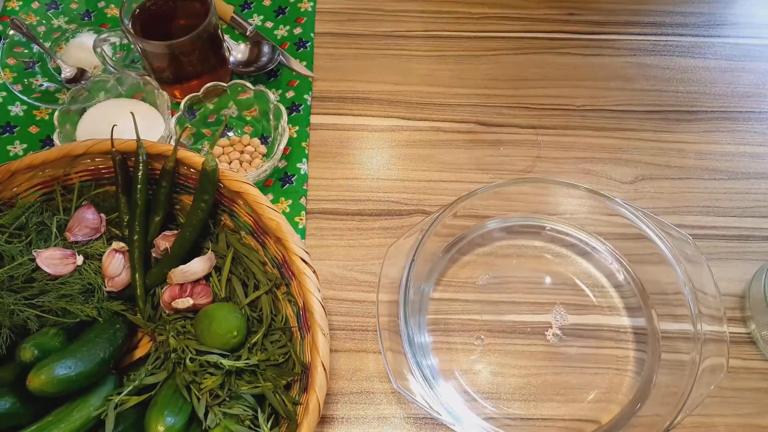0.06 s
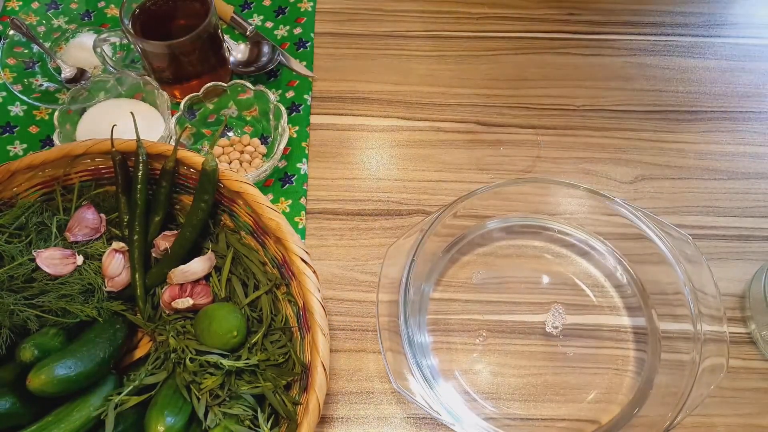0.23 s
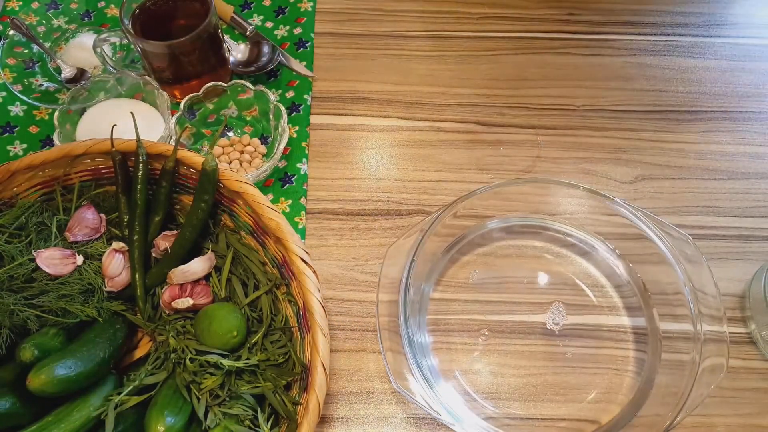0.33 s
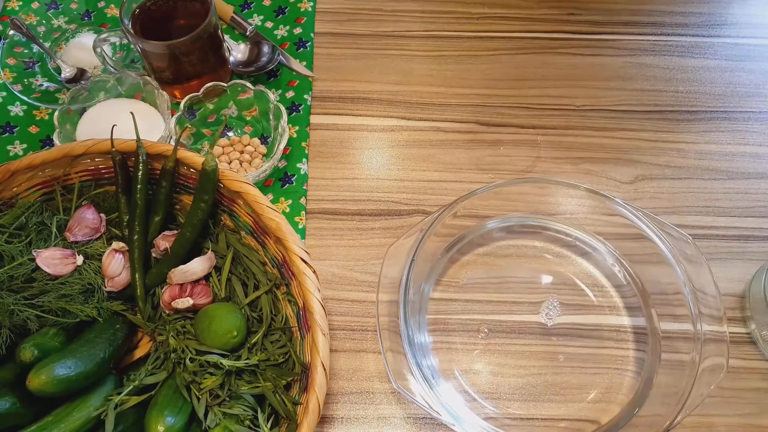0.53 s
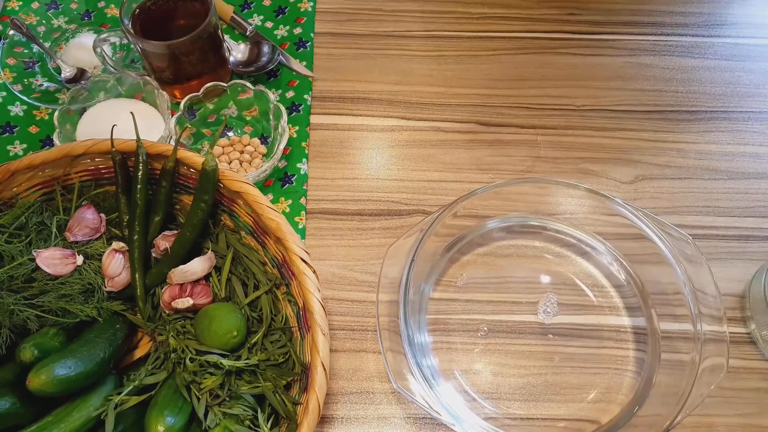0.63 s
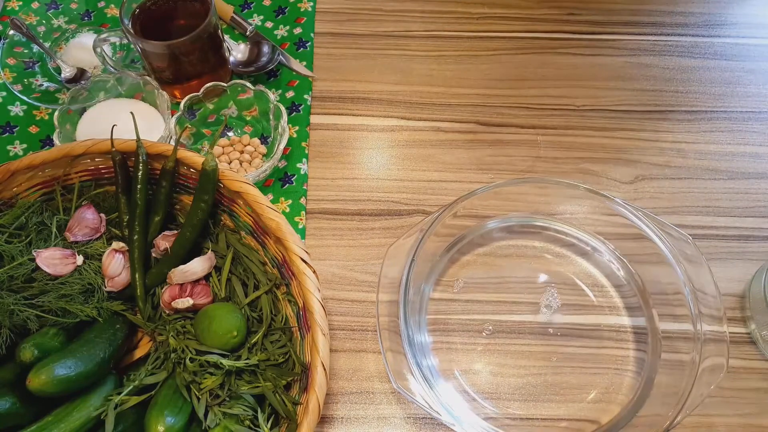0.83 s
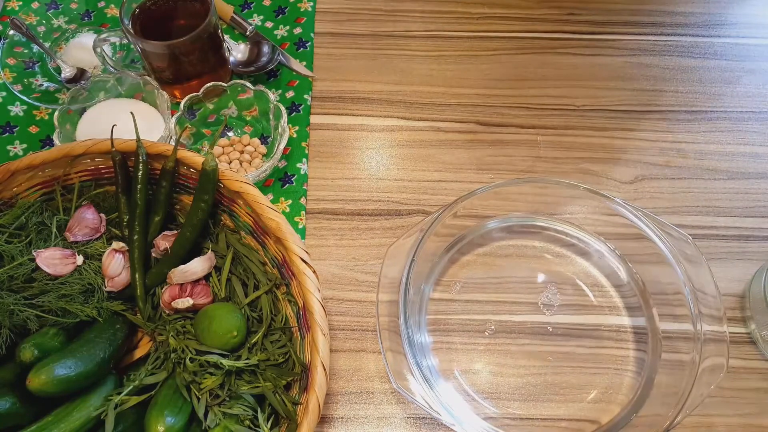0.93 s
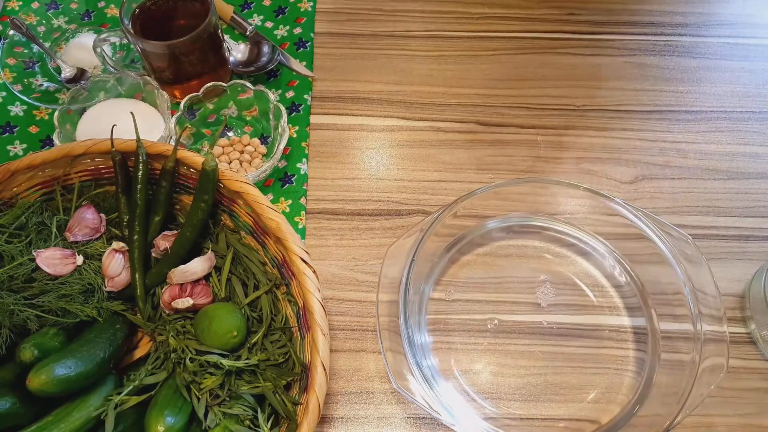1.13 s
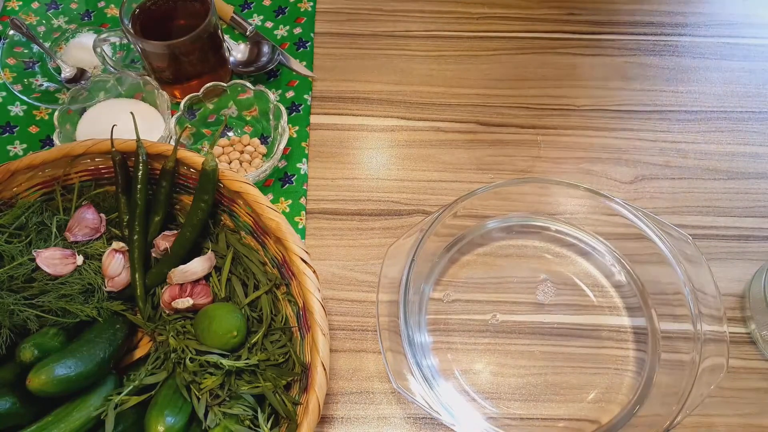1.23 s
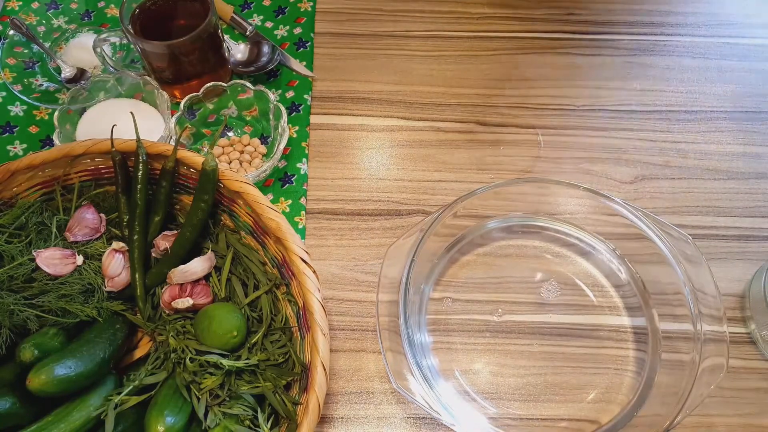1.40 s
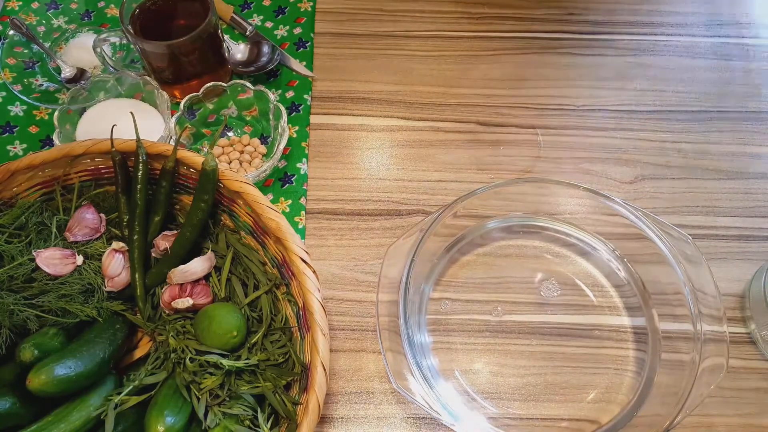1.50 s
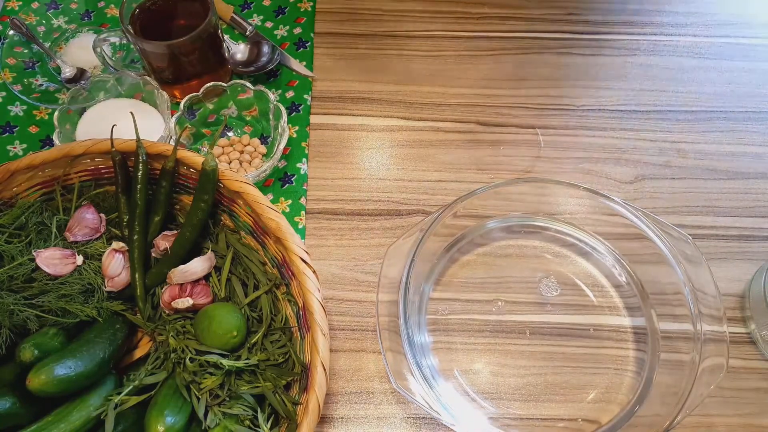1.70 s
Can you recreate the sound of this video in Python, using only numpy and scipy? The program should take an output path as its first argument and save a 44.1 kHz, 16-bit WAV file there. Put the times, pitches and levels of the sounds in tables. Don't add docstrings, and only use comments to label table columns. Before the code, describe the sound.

Glass jug thuds and grinds onto a wooden table top, then settles with a softer knock

```python
import sys
import numpy as np
from scipy import signal
from scipy.io import wavfile
from scipy.ndimage import uniform_filter1d

SR = 44100
rng = np.random.default_rng(int(sys.argv[2]) if len(sys.argv) > 2 else 0)


def decibels_to_gain(level_db):
    exponent = np.asarray(level_db, float) / 20
    return 10 ** exponent


def materialize(psi):
    bounded = np.clip(np.atleast_2d(psi).T, -1, 1)
    quanta = np.round(bounded * 32767).astype(np.int16)
    wavfile.write(sys.argv[1], SR, quanta)


N = 77175

# (frequency [Hz], level [dB per Hz])
RUMBLE = [(15, -39), (25, 3.5), (55, -6.5), (84, -0.5), (156, -10), (338, -10), (388, -10.5), (585, -15),
          (769, -25.5), (1500, -37), (1950, -99)]
# (time [s], level [dB])
AIRFLOW = [
    (0, 0.5),
    (.2, -1.5),
    (.45, -1.5),
    (.8, 1.5),
    (1.05, -1),
    (1.2, 1.5),
    (1.3, -1.5),
    (1.6, 1.5),
    (1.68, 1),
    (1.75, -3.5),
]
# (frequency [Hz], width [Hz], level [dB rms])
DRONES = [(158.5, 13.5, -61.5), (223, 74, -57.5), (265.7, 19.5, -59)]
# (frequency [Hz], level [dB per Hz])
HISS = [(590, -46), (1000, -13), (2710, -11), (3490, -8), (4390, -13.5), (5150, -18), (7610, -23),
        (9470, -13.5), (15500, -1.5)]
# (frequency [Hz], likeness [0-1])
SAME = [(60, 0.65), (180, 1), (550, 0.15), (1650, 0.02), (4970, 0), (15000, 0.08)]
HUM_ORDERS = [1, 6, 8, 9, 10, 11, 12, 13, 14, 17]
HUM_DB = [-53, -65.5, -87, -67.5, -69, -70.5, -72, -78, -81, -86.5]
WHINE_ORDERS = [63, 64, 65, 66, 67, 69, 70, 71, 72, 73, 74, 75, 76, 79, 85]
WHINE_DB = [-88, -89, -86, -89, -90, -80, -81.5, -74, -73, -76, -90, -85.5, -87.5, -89, -87]
# (time [s], level [dB])
WHINE_SWELL = [(0, -73), (.25, -71), (.354, -75), (.57, -69), (.7, -72), (.95, -74.5), (1.25, -66.5),
               (1.34, -69.5), (1.42, -80), (1.6, -80), (1.72, -75)]
SMEAR_RAD = (.283, -.8, -3.7, 0)
# (time [s], low tone [Hz], its level [dB rms], high tone [Hz], its level [dB rms])
FAN = [
    (0, 64.3, -64, 335.5, -60),
    (.36, 64.3, -57, 335.2, -55),
    (.4, 65.9, -57, 334.5, -55),
    (.65, 65.9, -57, 334.8, -52.5),
    (.88, 65.9, -61, 335.8, -59),
    (1, 65.5, -58, 336, -60),
    (1.05, 64.2, -57, 335.9, -60),
    (1.5, 64.1, -54, 335.8, -59.5),
    (1.62, 64.2, -59, 335.8, -56),
    (1.75, 64.2, -64, 335.8, -59),
]
# (time [s], strength [dB], contact [ms])
LANDING = [(.2158, -23.5, 0.92), (.2235, -23.5, 0.7), (.2320, -17, 1.14), (.2385, -21, 0.71),
           (.2470, -27.5, 0.72), (.2560, -28.5, 1.46), (.2640, -16.5, 1.56), (.2760, -38, 3.4),
           (.2900, -42, 0.78), (.3060, -47, 1.6), (.3380, -29, 2.1), (.3680, -49, 0.53)]
# (time [s], strength [dB], contact [ms])
SETTLING = [
    (.6345, -43.5, 0.64),
    (.6480, -39, 0.4),
    (.6600, -59, 3.3),
    (.6695, -35.5, 0.8),
    (.6820, -34.5, 2.56),
    (.6945, -44, 1.83),
]
# (frequency [Hz], t60 [s], landing level [dB], settling level [dB])
TABLE = [(120, 0.022, -13, 4.5), (217.5, 0.05, -7, 3), (314, 0.1, -8, 1.5), (390.2, 0.038, 2, 7),
         (435.6, 0.07, -9.5, -4.5), (485.4, 0.054, -4.5, -19), (576.6, 0.078, -4.5, -2.5),
         (717.4, 0.097, -4, -2), (791, 0.032, 5, -5.5), (881, 0.071, -5, -18), (970, 0.043, -13, -28),
         (1310, 0.063, -28.5, -15), (1646, 0.11, -13.5, -41), (1690, 0.14, -19.5, -36)]
# (frequency [Hz], left-right level [dB], left lead [rad])
EARS = [(79.3, 1.5, 0.1), (261, 0, 0.54), (420, 2.5, 0.5), (543, -4.5, 0), (580, 5.5, -1.5),
        (782, 1.5, 2.23), (890, 7.5, 1.5), (1700, 0.5, 4)]
# (frequency [Hz], level [dB per Hz])
GRIT = [(900, 11), (1700, -3.5), (2500, -14), (3800, -18.5), (5800, -26.5), (7300, -31), (9000, -23.5),
        (15500, -25.5)]
# (time [s], level [dB])
PRESS = [
    (.212, -50),
    (0.218, -25),
    (.227, -16.5),
    (.245, -19),
    (.276, -20),
    (.284, -25.5),
    (.315, -30),
    (.345, -35.5),
    (.45, -55),
]
# (time [s], frequency [Hz], peak level [dB], rise [s], t60 [s])
SWAYS = [(.2150, 12300, -60, .006, .08), (.2150, 8830, -59, 0.0087, .1), (.2135, 527, -20.5, 0.016, .07),
         (0.218, 162, -24.5, 0.021, 0.16), (.2140, 415, -28, .012, .08), (.2135, 735, -25, .012, .11),
         (.2300, 760, -28, .014, .05), (.2320, 620, -29, .014, .1), (.2450, 1560, -46, .02, .12),
         (.2200, 4180, -64, .02, .5), (.2300, 12250, -61, .004, .05), (.2400, 560, -29, .012, .07),
         (.2450, 403, -30, .018, .06), (.2320, 88, -28, 0.023, 0.081), (0.295, 79, -33, 0.02, 0.14),
         (.2980, 511, -35, 0.015, 0.12), (.3250, 470, -36, .014, .04), (.6290, 524, -39, 0.0083, 0.13),
         (0.633, 162, -31.5, 0.025, 0.09), (.6310, 753, -40.5, 0.028, 0.07), (.6300, 372, -37, 0.01, 0.2),
         (.6620, 405, -39, 0.015, 0.07), (0.671, 152, -37, 0.016, 0.05), (.6550, 305, -39, .012, .05),
         (.6820, 345, -36.5, .013, .04), (.6900, 275, -37, 0.009, 0.05), (.6950, 210, -44, .02, .1),
         (.7200, 400, -47, .025, .1)]
# (time [s], level [dB])
PANEL = [
    (.217, -34),
    (.232, -25),
    (.265, -22),
    (.300, -34),
    (.318, -37),
    (.335, -34.5),
    (.368, -39.5),
    (.388, -54),
    (.418, -46),
    (.44, -62),
]
# (frequency [Hz], t60 [s])
KITCHEN = [(80, 0.66), (320, 0.57), (700, 0.42), (1600, 0.19), (3000, 0.17), (8000, 0.37)]
# (frequency [Hz], level [dB per Hz])
LATE_HISS = [(2000, -1.5), (3200, -7), (5500, -7.5), (8000, -7), (11000, 1)]

RUMBLE_DB, HISS_DB, LATE_HISS_DB = -54, -61, -68.5
HITS_WET_DB, SWAYS_WET_DB, PANEL_WET_DB = -7.5, -10.5, -20
SHAFT_HZ, HUM_START_RAD = 49.13, -.93
CORE_ORDER, CORE_SPAN = 72, 3.5
WAVER_DB, WAVER_HZ, DRIFT_RAD, SCATTER_RAD = 1.2, 4.0, .12, .05
FAN_START_RAD = 2.5
MAINS_HZ, BUZZ_DB, BUZZ_SPREAD_DB = 99.94, -90, 3.5
SPOT_DB, SPOT_RAD_PER_KHZ = 2.5, 1.5
GRIT_DB, GRIT_T60, GRIT_RISE_S = -20, 0.18, 0.0015
PANEL_HZ = 264.9
LATE_HISS_START_S, LATE_HISS_RISE_S = 1.31, 0.34
LOW_CUT_HZ, TOP_HZ = 38, 15480


def read(points, hz):
    f, value = np.transpose(points)
    return np.interp(np.log(hz + 1), np.log(f + 1), value)


def evened(x):
    return x / np.sqrt(np.mean(x ** 2) + 1e-30)


def slow(rate_hz, count):
    t = np.arange(N)[::64] / SR
    f = rate_hz * np.geomspace(.1, 1, num=8)[:, None]
    rows = []
    for start in rng.random((count, 8)):
        wander = np.sin(2 * np.pi * (f * t + start[:, None])).sum(0)
        rows.append(evened(wander).repeat(64)[:N])
    return np.array(rows)


def noise(spectrum, patchy_db, low_hz, high_hz):
    frames, hz = N // 512 + 5, np.fft.rfftfreq(2048, 1 / SR)
    a, b, c, d, patches = rng.standard_normal((frames, 1025, 5)).T
    patches = uniform_filter1d(patches, size=8, axis=0)
    patches = evened(uniform_filter1d(patches, size=6, axis=1))
    same = np.clip(read(SAME, hz), -1, 1)[:, None]
    left = a + 1j * b
    right = same * left + np.sqrt(1 - same ** 2) * (c + 1j * d)
    edge = np.minimum(hz / low_hz, 1) ** 4 / (1 + (hz / high_hz) ** 4)
    colour = decibels_to_gain(read(spectrum, hz)[:, None] + patchy_db * patches) * edge[:, None]
    return evened(signal.istft(np.array([left, right]) * colour, nperseg=2048, noverlap=1536)[1][:, :N])


def rumble():
    sides = decibels_to_gain(RUMBLE_DB + np.array([[.5], [-.5]]))
    return sides * noise(RUMBLE, patchy_db=1.5, low_hz=25.3, high_hz=1360)


def hiss():
    sides = decibels_to_gain(HISS_DB + np.array([[1.1], [-1.1]]))
    return sides * noise(HISS, patchy_db=1.0, low_hz=1000, high_hz=21000)


def drones():
    t, out = np.arange(N) / SR, np.zeros((2, N))
    for hz, width_hz, db in DRONES:
        r = np.exp(-np.pi * width_hz / SR)
        z = rng.standard_normal((2, N + SR // 4, 2)) @ [1, 1j]
        z = signal.lfilter([1], [1, -2 * r, r * r], z)[:, -N:]
        pair = np.array([z[0] + 0.14 * z[1], z[0] - 0.45 * z[1]])
        out += decibels_to_gain(db) * evened((pair * np.exp(2j * np.pi * hz * t)).real)
    return out


def orders(multiples, levels_db, apart_rad):
    k, t, count = np.array(multiples)[:, None], np.arange(N) / SR, len(multiples)
    smear = np.polyval(SMEAR_RAD, k - CORE_ORDER) + SCATTER_RAD * rng.standard_normal((count, 1))
    start = np.where(k > 1, smear + DRIFT_RAD * slow(WAVER_HZ, count), HUM_START_RAD)
    phase = 2 * np.pi * SHAFT_HZ * k * t + start
    size = np.sqrt(2) * decibels_to_gain(levels_db + WAVER_DB * slow(WAVER_HZ, count) * (k > 1))
    lean = apart_rad * (k > 1)
    return np.array([(size * np.sin(phase + side * lean) / np.cos(lean)).sum(0) for side in (-1, 1)])


def fridge():
    s, db = np.transpose(WHINE_SWELL)
    core = np.exp(-((np.array(WHINE_ORDERS)[:, None] - CORE_ORDER) / CORE_SPAN) ** 2)
    swell_db = core * np.interp(np.arange(N) / SR, s, db + 71.0)
    whine = orders(WHINE_ORDERS, np.array(WHINE_DB)[:, None] + swell_db, apart_rad=0.75)
    hum = orders(HUM_ORDERS, np.array(HUM_DB)[:, None], apart_rad=0.54)
    return hum + whine


def fan():
    t, (s, *columns) = np.arange(N) / SR, np.transpose(FAN)
    low_hz, low_db, high_hz, high_db = [np.interp(t, s, c) for c in columns]
    hz, db = np.array([low_hz, high_hz]), np.array([low_db, high_db])
    size = np.sqrt(2) * decibels_to_gain(db + .6 * slow(5.0, count=2))
    phase = 2 * np.pi * hz.cumsum(1) / SR + FAN_START_RAD + .1 * slow(3.0, count=2)
    return (size * np.sin(phase)).sum(0) * decibels_to_gain(np.array([[.7], [-.7]]))


def lamp():
    t, k = np.arange(N) / SR, np.arange(110, 155)[:, None]
    spread, start = rng.standard_normal((len(k), 2, 2)).T[:, :, :, None]
    tilt_db = 3.5 * (k / k[-1] - 1) * 3
    size = decibels_to_gain(BUZZ_DB + tilt_db + BUZZ_SPREAD_DB * spread)
    return (size * np.sin(2 * np.pi * MAINS_HZ * k * t + 2 * start)).sum(1)


def ears(hz):
    f, db, lead = np.transpose(EARS)
    side = np.array([.5, -.5]).reshape(2, *[1] * np.ndim(hz))
    return decibels_to_gain(side * read(np.c_[f, db], hz)), side * read(np.c_[f, lead], hz)


def knock(blows, column):
    t, out, grit = np.arange(SR // 2) / SR, np.zeros((2, N + SR)), np.zeros(N + SR)
    modes = np.array(TABLE)
    hz, t60, mode_db = (modes[:, [k]] for k in (0, 1, column))
    gain, lead = ears(hz)
    spots = rng.standard_normal((len(blows), 2, len(TABLE), 1))
    for (s, db, contact_ms), (spot, skew) in zip(blows, spots):
        at = round(s * SR)
        span = slice(at, at + len(t))
        push = np.sin(np.pi * np.clip(t[:256] / (contact_ms / 1000), 0, 1))
        size = decibels_to_gain(db + mode_db + SPOT_DB * spot - 60 * t / t60)
        for ear in (0, 1):
            turn = lead[ear] + (.5 - ear) * SPOT_RAD_PER_KHZ * np.minimum(hz / 1000, 1) * skew
            ring = (gain[ear] * size * np.sin(2 * np.pi * hz * t + turn)).sum(0)
            ring *= np.minimum(t / 0.0016, 1)
            out[ear, span] += signal.oaconvolve(ring, push / push.sum())[:len(t)]
        rise = np.minimum(t / GRIT_RISE_S, 1) ** 2
        grit[span] += rise * decibels_to_gain(2 * (db - 60 * t / GRIT_T60)) / contact_ms ** 2
    return out[:, :N], np.sqrt(grit[:N])


def jug():
    grind = decibels_to_gain(np.interp(np.arange(N) / SR, *np.transpose(PRESS), left=-120, right=-120))
    landing, _ = knock(LANDING, column=2)
    settling, settling_grit = knock(SETTLING, column=3)
    grains = decibels_to_gain(evened(uniform_filter1d(rng.standard_normal(N), size=90)))
    buzz = grains * noise(GRIT, patchy_db=0.5, low_hz=777, high_hz=20000)
    return landing + settling + decibels_to_gain(GRIT_DB) * (grind + settling_grit) * buzz


def sways():
    t, out = np.arange(N) / SR, np.zeros((2, N))
    for s, hz, db, rise_s, t60 in SWAYS:
        u = np.maximum(t - s, 0)
        rise = np.sin(np.pi / 2 * np.minimum(u / rise_s, 1)) ** 1.16
        shape = rise * decibels_to_gain(db - 60 * np.maximum(u - rise_s, 0) / t60)
        gain, lead = ears(np.array([hz]))
        out += gain * shape * np.sin(2 * np.pi * hz * u + lead)
    return out


def panel():
    t, (s, db) = np.arange(N) / SR, np.transpose(PANEL)
    gate = np.clip(np.minimum(t - s[0], s[-1] - t) * 200, 0, 1)
    tone = np.sin(2 * np.pi * PANEL_HZ * t + np.array([[-.05], [0]]))
    return np.sqrt(2) * gate * decibels_to_gain(np.interp(t, s, db)) * tone


def kitchen(x):
    taps, slots = np.zeros((2, SR)), np.arange(120, SR - 20, 20)
    at = slots + rng.integers(0, 20, (2, len(slots)))
    np.put_along_axis(taps, at, rng.choice([-1., 1.], at.shape), 1)
    hz, t, z = signal.stft(taps, SR, nperseg=512)
    same = np.clip(read(SAME, hz), -1, 1)[:, None]
    z = np.array([z[0], same * z[0] + np.sqrt(1 - same ** 2) * z[1]])
    decay = decibels_to_gain(-60 * t / read(KITCHEN, hz)[:, None])
    tail = signal.istft(z * decay, SR, nperseg=512)[1]
    return signal.fftconvolve(x, tail / np.linalg.norm(tail[0]), axes=1)[:, :N]


def late_hiss():
    rise = np.clip((np.arange(N) / SR - LATE_HISS_START_S) / LATE_HISS_RISE_S, 0, 1)
    return decibels_to_gain(LATE_HISS_DB) * rise * noise(LATE_HISS, patchy_db=2.0, low_hz=2000, high_hz=12100)


def scene():
    hits, swells, ring = jug(), sways(), panel()
    low_air, thin_hiss = rumble(), hiss()
    airflow = decibels_to_gain(np.interp(np.arange(N) / SR, *np.transpose(AIRFLOW)))
    air = airflow * (low_air + drones())
    wet = kitchen(decibels_to_gain(HITS_WET_DB) * hits + decibels_to_gain(SWAYS_WET_DB) * swells + decibels_to_gain(PANEL_WET_DB) * ring)
    return hits + swells + ring + wet + air + thin_hiss + fridge() + fan() + lamp() + late_hiss()


def low_pass(x):
    return signal.sosfilt(signal.butter(12, 16460, fs=SR, output="sos"), x)


def record(dry):
    low_cut = signal.butter(4, LOW_CUT_HZ, "high", fs=SR, output="sos")
    cut = signal.sosfiltfilt(low_cut, dry, padlen=4000)
    band_limit = signal.firwin(1023, TOP_HZ, window=("kaiser", 9), fs=SR)
    mix = signal.oaconvolve(cut, band_limit[None], "same")
    return low_pass(mix)


dry = scene()
out = record(dry)
materialize(out)
```